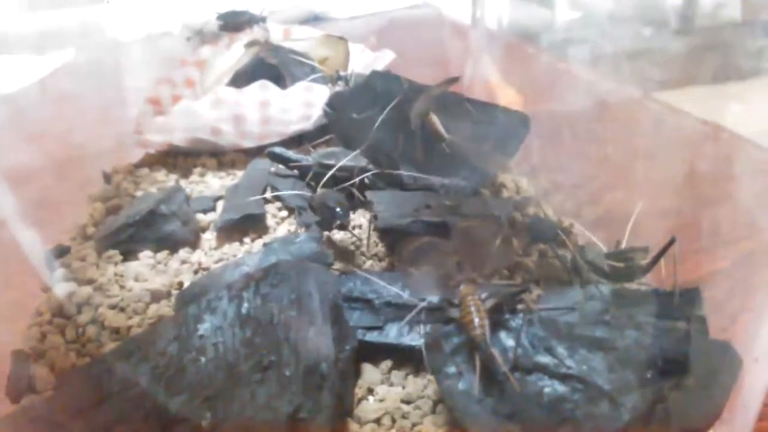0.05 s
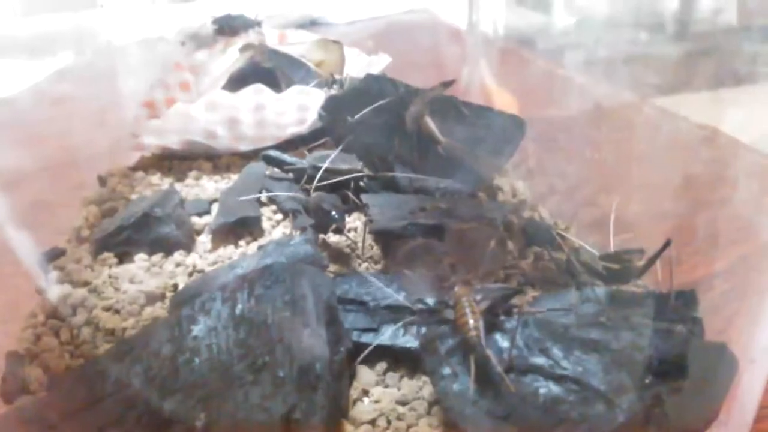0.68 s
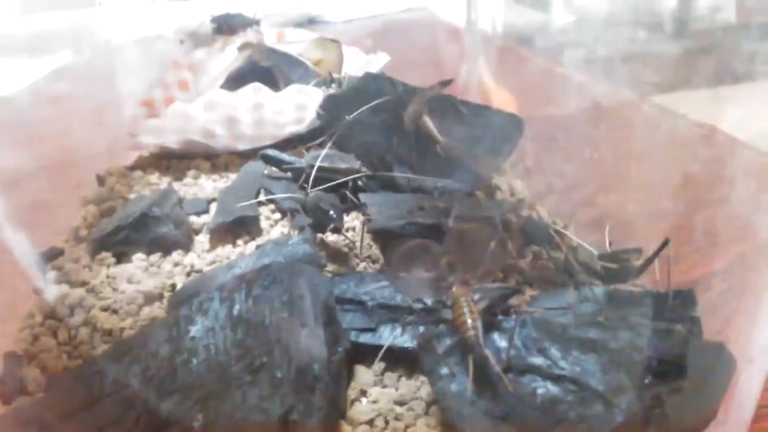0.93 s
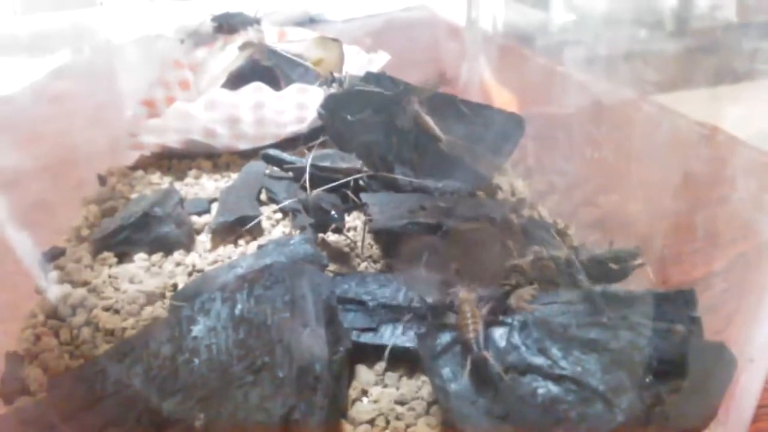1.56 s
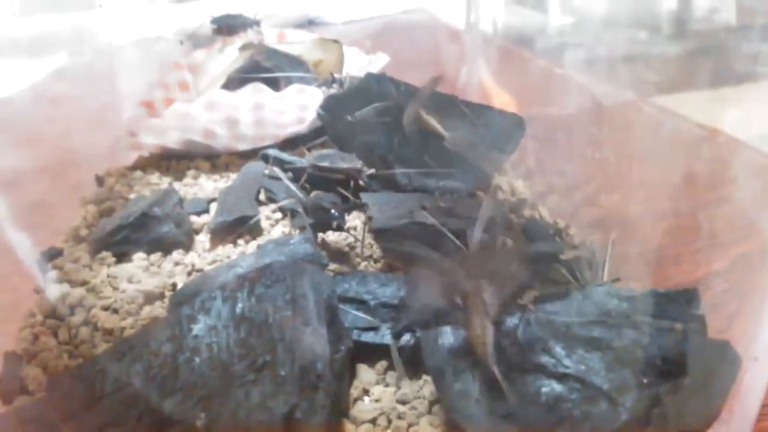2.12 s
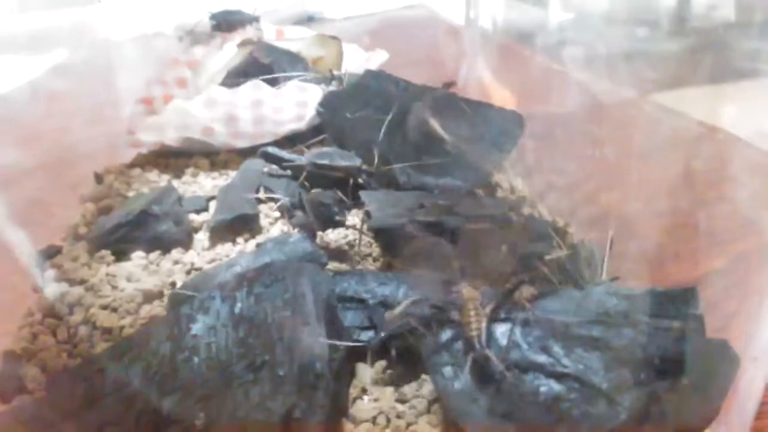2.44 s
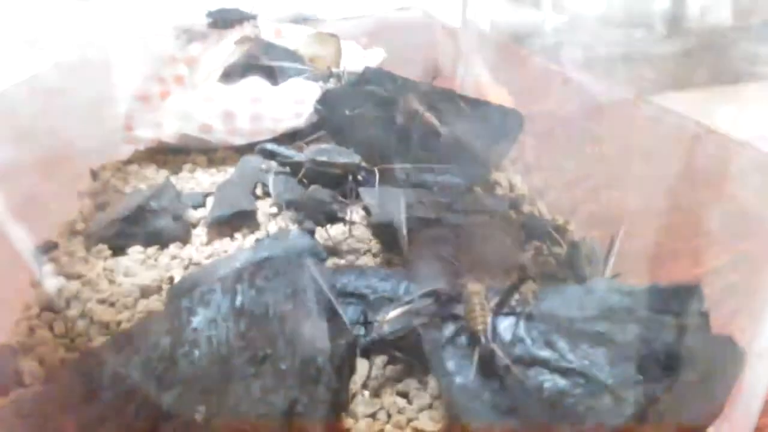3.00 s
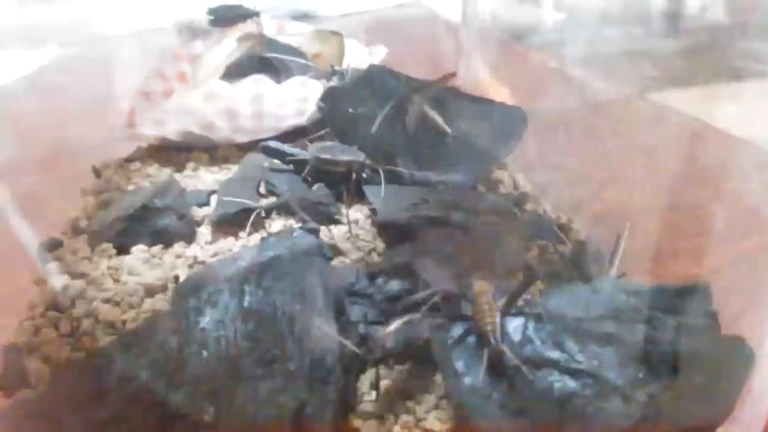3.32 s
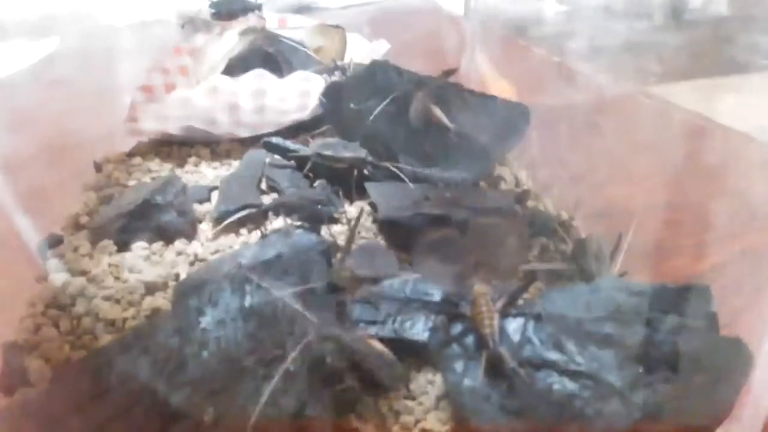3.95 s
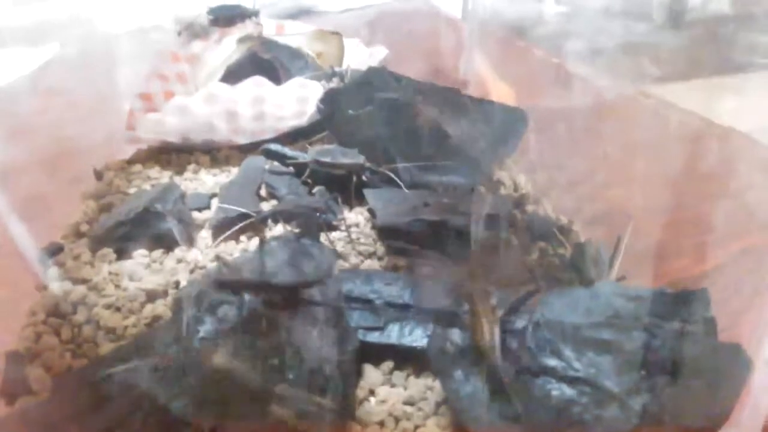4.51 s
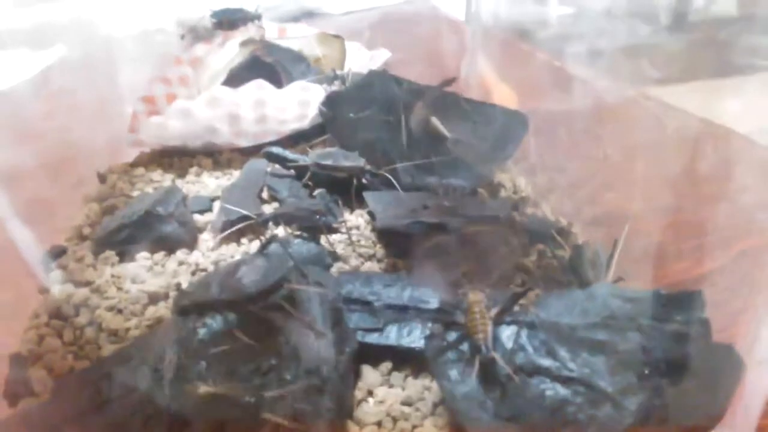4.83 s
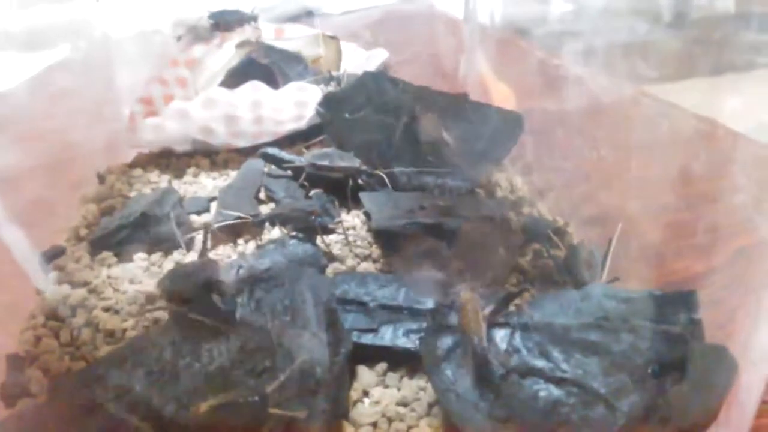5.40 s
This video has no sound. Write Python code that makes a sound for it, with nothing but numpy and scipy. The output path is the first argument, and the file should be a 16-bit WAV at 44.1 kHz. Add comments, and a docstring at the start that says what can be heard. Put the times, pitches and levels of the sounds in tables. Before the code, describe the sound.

Indoors, a cricket sings inside a small plastic tank, picked up by one microphone over faint background hiss. Its thin, high, rapidly pulsing trill comes in quietly after a moment, then surges and falls back again and again, ringing and a little raspy. A single small, light knock falls among the later surges, and the trill carries on to the end.

```python
"""Cricket in a plastic enclosure

A cricket rubs file on scraper at about 45 wing beats a second. Each stroke rings the wings
near 4.6 kHz, with an octave overtone and a rasp; the walls smear the strokes together.
The trill starts soft, then swells in waves. One light knock; faint hiss throughout."""
import sys
import numpy as np
from scipy import signal
from scipy.fft import rfft, irfft
from scipy.io import wavfile
from scipy.ndimage import uniform_filter1d

SR = 44100
rng = np.random.default_rng(int(sys.argv[2]) if len(sys.argv) > 2 else 0)


def dump(signal):
    """Clip the signal to [-1, 1] and save it as 16-bit WAV at the path in sys.argv[1]."""
    limited = np.clip(np.atleast_2d(signal).T, -1, 1)
    pcm = np.round(limited * 32767).astype(np.int16)
    wavfile.write(sys.argv[1], SR, pcm)


N = 249606
TIME = np.arange(N) / SR

# wing beat rate: t/s, f/Hz
BEAT_RATE = [(0.95, 47.8), (1.2, 47.6), (1.5, 42.5), (1.72, 48.8), (2.0, 44.9), (2.65, 46.8), (2.9, 49.1),
             (3.25, 45.2), (3.85, 45.8), (4.0, 35.9), (4.17, 45.0), (4.6, 44.3), (4.85, 39.2), (5.1, 45.2),
             (5.66, 42.1)]
# soft trill under the swells: t/s, level/dB
SOFT_TRILL = [(.95, -60), (1.2, -58.5), (1.55, -59.5), (2.45, -53.5), (3.85, -51), (4.8, -52.5),
              (5.66, -49)]
# cricket presses harder: start/s, hold/s, tone level/dB, octave level/dB
SWELLS = [(1.594, 0.42, -45.5, -66.5), (1.929, 0.23, -45, -66.5), (2.766, .14, -43.5, -64.5),
          (3.044, 0.0971, -38, -72), (3.162, .22, -42, -71.5), (3.513, 0.17, -44.5, -65.5),
          (3.946, 0.15, -47.5, -75.5), (4.032, 0.092, -38, -71.5), (4.184, 0.22, -41, -64.5),
          (4.519, 0.024, -47.5, -76.5), (4.922, .1, -41.5, -64), (5.05, .24, -40.5, -63)]
# rasp of the file: f/Hz, relative density/dB
RASP_SPECTRUM = [(2500, -23.5), (3850, 5), (4040, -7.5), (4220, 11), (4900, 9.5), (5400, 2.5), (5720, -9),
                 (6050, 0.5), (6450, -10), (6900, 0), (7250, -19.5), (7600, 0), (8100, -13), (8900, -11.5),
                 (9400, 4), (10200, -42.5)]
# rasp envelope: t/s, level/dB
RASP_LEVEL = [(.8, -89), (.92, -73), (1.2, -71), (1.55, -66), (1.95, -60), (2.3, -62.5), (2.45, -67),
              (2.85, -61), (3.65, -60), (3.95, -62.5), (4.36, -60), (4.8, -63), (5.02, -60), (5.66, -61.5)]
# echoes off the nearest walls: delay/s, level/dB
WALL_ECHOES = [(.0012, -16), (.0028, -11)]
# light knock: t/s, level/dB
KNOCKS = [(4.1976, -43)]
# knock resonances: f/Hz, relative level/dB, t60/s
KNOCK_MODES = [(660, -11.5, 0.036), (885, -3, 0.021), (1080, 3.5, 0.0062), (2420, -6.5, 0.0091),
               (3200, -3.5, 0.0081)]
# background hiss: f/Hz, relative density/dB
HISS_SPECTRUM = [(15, -55.5), (25, -21), (42, -4.5), (70, 0.5), (186, -5.5), (233, -5.5), (394, -7),
                 (546, -7.5), (1020, -10), (2460, -12), (3960, -13), (4260, -16.5), (5210, -27),
                 (8180, -28.5), (10000, -41.5), (13000, -88), (22000, -120)]
# hiss envelope: t/s, level/dB
HISS_LEVEL = [(0, -62), (.88, -62), (1.05, -65), (1.6, -65.5), (5.66, -65.5)]


def cricket(start_s=.93, wing_hz=4657, light_flat_hz=83.9, bite_lift_hz=34.54, light_db=-56, span_db=14):
    """Strokes drive tone, octave and rasp. Light strokes fall short of the wings' own pitch."""
    tone_gain, octave_gain = song_gains()
    level_db = 20 * np.log10(tone_gain) + drift(20)
    biting = bite()
    effort = np.clip((level_db - light_db) / span_db, 0, 1) + .5 * biting
    pitch_hz = wing_hz - light_flat_hz * from_db(light_db - level_db) + bite_lift_hz * biting
    drive, bend_hz = wing_strokes(effort)
    phase = 2 * np.pi * np.cumsum(pitch_hz + bend_hz + 10 * drift(300)) / SR
    tone = from_db(level_db) * wing_tone(drive, phase)
    octave = octave_gain * wing_octave(drive, phase)
    singing = np.clip((TIME - start_s) / .01, 0, 1)
    return singing * (tone + octave) + file_rasp(drive)


def song_gains(soft_octave_db=-21.5):
    """Tone and octave gains: swells add in power to the soft trill; the octave lags and lingers."""
    soft = from_db(in_time(SOFT_TRILL)[0])
    tone_power = soft ** 2
    octave_power = (soft * from_db(soft_octave_db)) ** 2
    for start_s, hold_s, tone_db, octave_db in SWELLS:
        tone = swell(start_s, hold_s, attack_s=.045, tiring_db_per_s=10, release_db_per_s=74.5)
        octave = swell(start_s, hold_s, attack_s=.07, tiring_db_per_s=0, release_db_per_s=49)
        tone_power += (from_db(tone_db) * tone) ** 2
        octave_power += (from_db(octave_db) * octave) ** 2
    return np.sqrt(tone_power), np.sqrt(octave_power)


def swell(start_s, hold_s, attack_s, tiring_db_per_s, release_db_per_s):
    """Gain of one swell: quick rise, tiring hold, steady fall."""
    age_s = np.maximum(TIME - start_s, 0)
    loss_db = tiring_db_per_s * age_s + release_db_per_s * np.maximum(age_s - hold_s, 0)
    return np.minimum(age_s / attack_s, 1) * from_db(-loss_db)


def bite(rise_s=.0142, fade_s=.17):
    """Each swell bites hardest at first: near 1 just after onset, then fading."""
    ages_s = [np.maximum(TIME - start_s, 0) for start_s, *_ in SWELLS]
    return sum(np.minimum(age_s / rise_s, 1) * np.exp(-(age_s / fade_s) ** 2) for age_s in ages_s)


def wing_strokes(effort, opening_db=-9.5, uneven_db=2.5, detune_hz=14, glide_hz=40):
    """Drive and pitch bend/Hz of two strokes a beat. With effort they lengthen and merge."""
    beats = np.cumsum(in_time(BEAT_RATE)[0]) / SR
    per_beat = rng.standard_normal((400, 5))[beats.astype(int)]
    timing, open_force, close_force, detune, sag_spread = per_beat.T
    place = beats % 1 + .021 * timing
    opening = contact(place, peak=.14, rise=.07 + .06 * effort, fall=.07 + .23 * effort)
    closing = contact(place, peak=.59, rise=.075 + .175 * effort, fall=.115)
    drive = opening * from_db(opening_db + uneven_db * open_force)
    drive += closing * from_db(uneven_db * close_force)
    # wings slow towards each turn: pitch sags
    slowing = np.clip((place - .54) / .2, 0, 1.15) ** 2 + contact(place, peak=0, rise=.16, fall=.19)
    sag_hz = sag_depth_hz(effort) * slowing * from_db(2.9 * sag_spread)
    glide = np.clip(1 - 2 * place, -.5, .5)
    return drive, detune_hz * detune + glide_hz * glide - sag_hz


def contact(place, peak, rise, fall):
    """One contact of file and scraper; arguments in fractions of a beat."""
    return np.exp(-np.abs((place - peak) / np.where(place < peak, rise, fall)) ** 3)


def sag_depth_hz(effort, light_hz=104.2, full_hz=64.9, slack_hz=44.9, lag_s=.14, width_s=.06):
    """Pitch sag at the turn; deepens as the wings slacken after each swell."""
    slack = sum(np.exp(-((TIME - start_s - hold_s - lag_s) / width_s) ** 2)
                for start_s, hold_s, *_ in SWELLS)
    return light_hz + (full_hz - light_hz) * effort + slack_hz * slack


def wing_tone(drive, phase):
    """Tone kept to a narrow band near 4.5 kHz; strokes beat against earlier echoes and clump."""
    tone_band = signal.butter(3, [4330, 4730], "band", fs=SR, output="sos")
    strokes = signal.sosfilt(tone_band, drive * np.sin(phase))
    clumps = levelled(enclosure(strokes, tail_db=-1, t60_s=.17), window_samples=1900)
    return rms_one(np.tanh(clumps / 2.1))   # rounds the strongest clumps


def wing_octave(drive, phase, sharp_hz=45.3):
    """Overtone just above the octave; follows the contact closely, with a weaker tail."""
    overtone = drive ** .39 * np.sin(2 * phase + 2 * np.pi * sharp_hz * TIME)
    return levelled(enclosure(overtone, tail_db=-11.5, t60_s=.16), window_samples=1500)


def file_rasp(drive, steady=.85, grit_db=1.8, snag_db=3):
    """The file's teeth hiss with each stroke and now and then snag."""
    teeth = coloured_noise(RASP_SPECTRUM) * (drive + steady)
    roughness_db = grit_db * drift(130) + snag_db * np.maximum(drift(70) - 1, 0)
    rasp = rms_one(enclosure(teeth * from_db(roughness_db), tail_db=-6, t60_s=.22))
    return from_db(in_time(RASP_LEVEL)[0] + drift(5.5)) * rasp


def enclosure(x, tail_db, t60_s):
    """Direct sound, wall echoes and a short diffuse tail."""
    t = TIME[:SR // 2]
    tail = rng.standard_normal(len(t)) * from_db(-60 * t / t60_s)
    response = from_db(tail_db) * tail / np.sqrt(np.sum(tail ** 2))
    response[0] += 1
    for delay_s, db in WALL_ECHOES:
        response[round(delay_s * SR)] += from_db(db)
    return signal.fftconvolve(x, response)[:N]


def knock():
    """A small hard contact rings a few short modes."""
    clicks = np.zeros(N)
    for t_s, db in KNOCKS:
        clicks[round(t_s * SR)] = from_db(db)
    return sum((-1) ** k * from_db(db) * ring(clicks, hz, t60_s)
               for k, (hz, db, t60_s) in enumerate(KNOCK_MODES))


def ring(clicks, hz, t60_s):
    """One mode: a unit click starts a decaying unit sine."""
    radius = from_db(-60 / (t60_s * SR))
    step_rad = 2 * np.pi * hz / SR
    feedback = [1, -2 * radius * np.cos(step_rad), radius ** 2]
    return signal.lfilter([0, np.sin(step_rad)], feedback, clicks + 1e-18)


def hiss():
    """Even background noise, slightly lower once the trill begins."""
    return from_db(in_time(HISS_LEVEL)[0]) * coloured_noise(HISS_SPECTRUM)


def coloured_noise(spectrum):
    """Unit-rms noise with the given spectrum."""
    hz, db = np.transpose(spectrum)
    bins_hz = np.maximum(np.fft.rfftfreq(N, 1 / SR), 1)
    gain = from_db(np.interp(np.log(bins_hz), np.log(hz), db))
    return rms_one(irfft(rfft(rng.standard_normal(N)) * gain, N))


def drift(rate_hz):
    """Unit-rms random wander below rate_hz."""
    lowpass = signal.butter(2, rate_hz, fs=SR, output="sos")
    return rms_one(signal.sosfilt(lowpass, rng.standard_normal(N + SR))[SR:])


def levelled(x, window_samples):
    """Steady the level across strokes, keeping each one's shape."""
    power = uniform_filter1d(uniform_filter1d(x ** 2, window_samples), window_samples // 2)
    return x / np.sqrt(np.maximum(power, 0) + 1e-9)


def in_time(rows):
    """Each column of a curve at every sample."""
    t_s, *columns = np.transpose(rows)
    return [np.interp(TIME, t_s, column) for column in columns]


def from_db(db):
    """Decibels to gain."""
    return 10 ** (np.asarray(db) / 20)


def rms_one(x):
    """Scale to unit rms."""
    return x / np.sqrt(np.mean(x ** 2) + 1e-20)


def scene():
    """Cricket, knock and hiss at one microphone."""
    return (cricket() + knock() + hiss())[None, :]


def record(dry):
    """The microphone loses the deepest bass; the top is cut steeply."""
    low_hz, high_hz = 38, 10150
    thin = signal.sosfilt(signal.butter(4, low_hz, "high", fs=SR, output="sos"), dry)
    return signal.sosfilt(signal.ellip(10, .2, 70, high_hz, fs=SR, output="sos"), thin)


dry = scene()
out = record(dry)
dump(out)
```